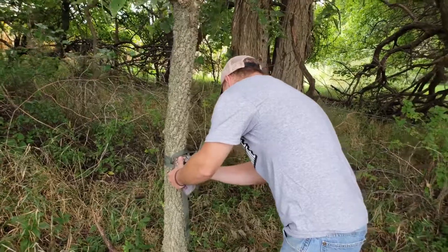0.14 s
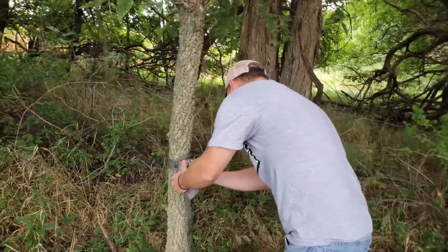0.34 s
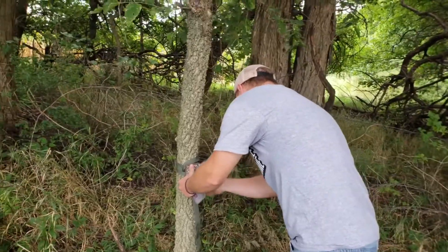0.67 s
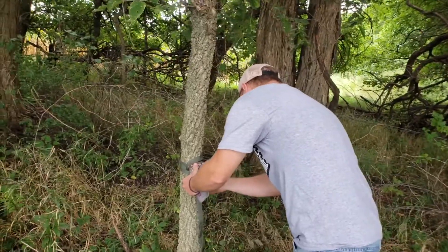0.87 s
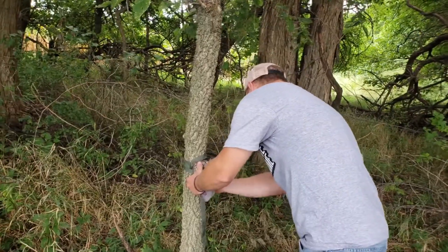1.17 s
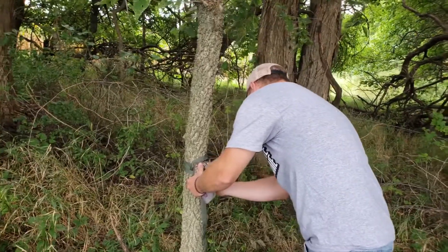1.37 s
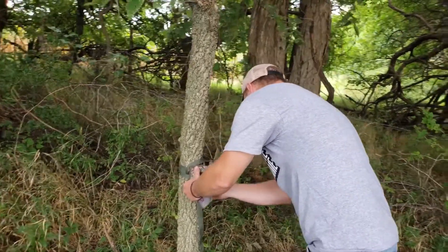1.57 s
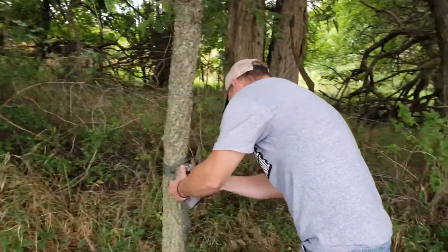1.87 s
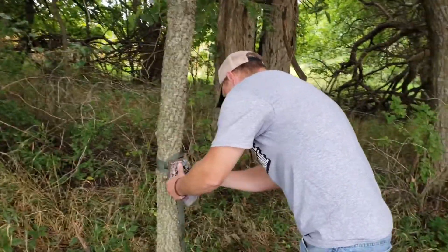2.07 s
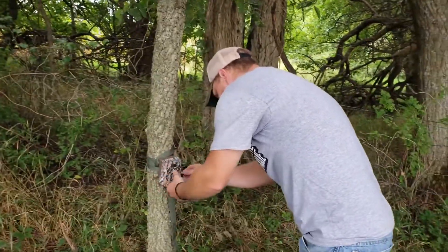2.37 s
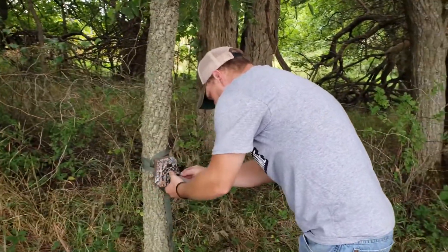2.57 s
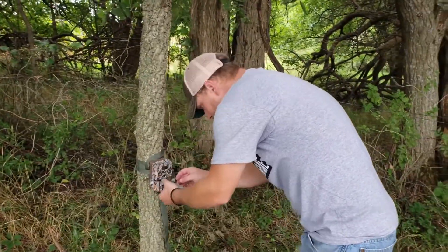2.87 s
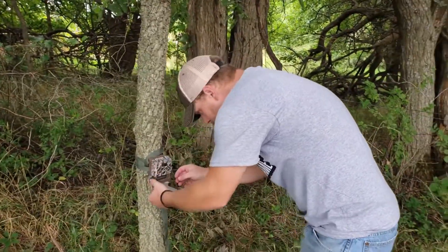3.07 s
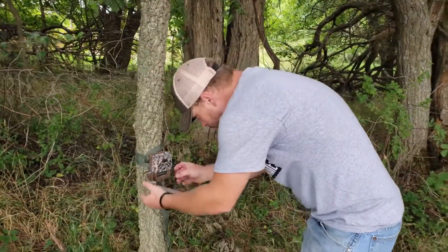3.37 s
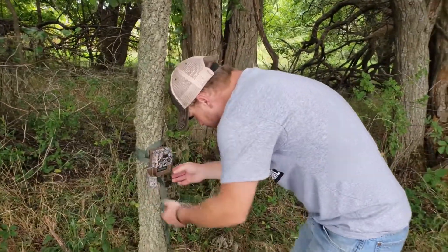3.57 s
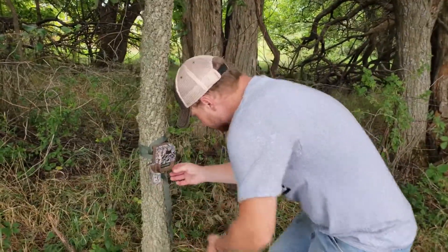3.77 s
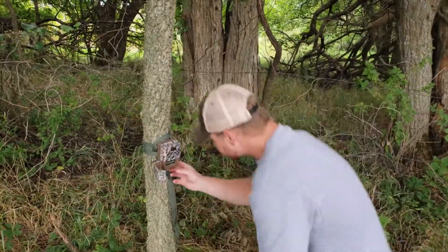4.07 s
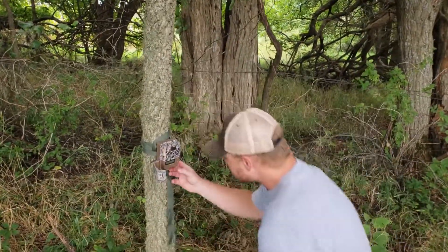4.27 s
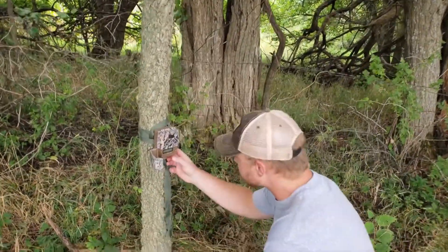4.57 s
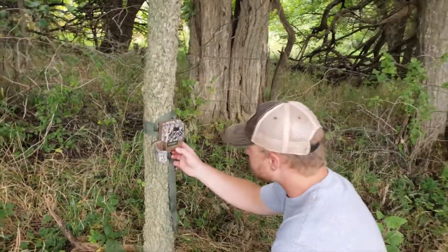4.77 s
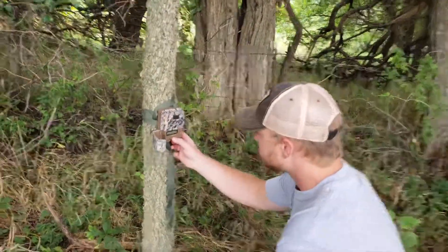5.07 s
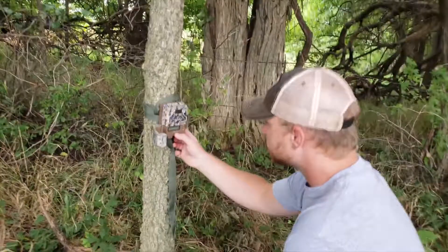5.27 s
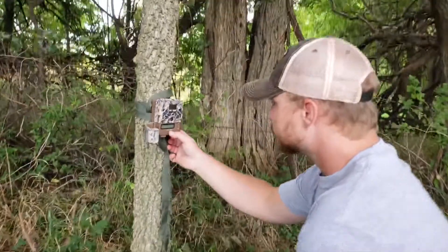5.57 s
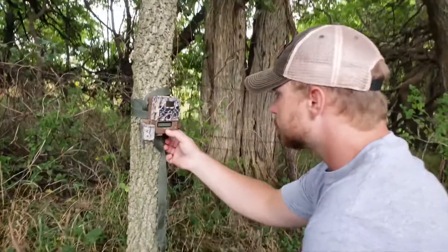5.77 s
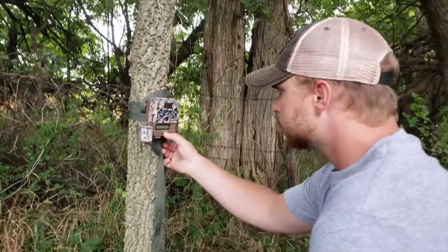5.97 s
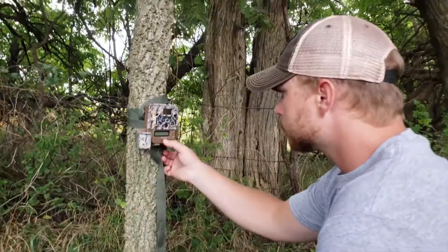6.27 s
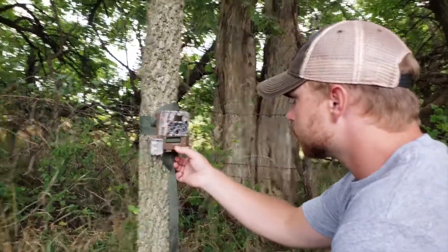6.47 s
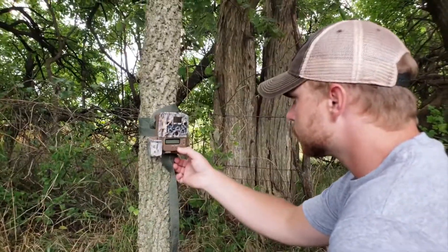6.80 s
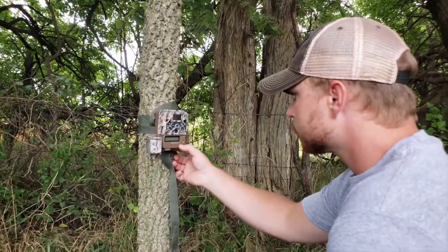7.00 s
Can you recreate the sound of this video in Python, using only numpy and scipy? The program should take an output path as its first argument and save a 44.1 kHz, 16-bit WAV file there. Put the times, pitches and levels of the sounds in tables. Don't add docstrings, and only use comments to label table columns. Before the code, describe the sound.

Hands snap and click a small hollow plastic case strapped to a tree, clothes rustling, while crickets chirp and katydids hiss steadily around.

```python
import sys
import numpy as np
from scipy import signal
from scipy.fft import rfft, irfft, next_fast_len
from scipy.io import wavfile
from scipy.ndimage import uniform_filter1d, map_coordinates

SR = 44100
rng = np.random.default_rng(int(sys.argv[2]) if len(sys.argv) > 2 else 0)


def attenuation_scalar(level_db):
    decades = np.asarray(level_db, float) / 20
    return 10 ** decades


def master(y):
    cut = np.clip(np.atleast_2d(y).T, -1, 1)
    pcm = np.round(cut * 32767)
    wavfile.write(sys.argv[1], SR, pcm.astype(np.int16))


N = 314874


def unit(x):
    return x / np.sqrt(np.mean(x ** 2) + 1e-20)


def along(points, hz):
    f, v = np.transpose(points)
    return np.interp(np.log(hz + 1), np.log(f + 1), v)


def curves(rows):
    s, *cols = np.transpose(rows)
    return [np.interp(np.arange(N) / SR, s, c) for c in cols]


def wobble(rate):
    knots = rng.standard_normal(int(N * rate / SR) + 4)
    return map_coordinates(knots, [np.arange(N) * rate / SR])


def filtered(x, response):
    m = next_fast_len(x.shape[-1] + 8192)
    return irfft(rfft(x, m) * response(np.fft.rfftfreq(m, 1 / SR)), m)[..., :x.shape[-1]]


def mode(f, hz, width_hz):
    return 1j * f * width_hz / (hz * hz - f * f + 1j * f * width_hz)


def add(track, s, sound):
    start = max(round(s * SR), 0)
    track[start:start + len(sound)] += sound[:len(track) - start]


def rush(spectrum, alike, patchy_db, grain_db=0):
    z = signal.stft(rng.standard_normal((2, N)), nperseg=512)[2]
    field = uniform_filter1d(rng.standard_normal(z.shape[1:]), 6, 0)
    field = uniform_filter1d(field, 10, 1)
    pair = signal.istft(z * attenuation_scalar(patchy_db * unit(field)), nperseg=512)[1][:, :N]
    grains = np.minimum(rng.exponential(size=N // 32 + 1), 4)
    pair = pair * attenuation_scalar(grain_db * np.repeat(grains, 32)[:N])

    def middle_and_side(hz):
        turn = np.arccos(np.clip(along(alike, hz), -1, 1)) / 2
        return attenuation_scalar(along(spectrum, hz)) * [np.cos(turn), np.sin(turn)]

    mid, side = filtered(pair, middle_and_side)
    return unit(np.array([mid + side, mid - side]))


# pitch_hz, level_db (per Hz)
AIR = [(12, -36.5), (20, -13), (102, -0.5), (172, -14), (210, -16.5), (255, -14.5), (432, -15.5),
       (493, -15.5), (671, -16), (1410, -19), (1760, -19.5), (2920, -19), (3800, -13.5), (4940, -29),
       (8360, -120)]
# pitch_hz, coherence (0 to 1)
AIR_ALIKE = [(40, 0.82), (130, 0.64), (290, 0.55), (640, 0.19), (3000, 0)]


def air():
    level_db = -69.5 + 0.17 * wobble(0.63) + np.array([[.5], [-.5]])
    return attenuation_scalar(level_db) * rush(AIR, AIR_ALIKE, patchy_db=1.5)


# pitch_hz, level_db (per Hz)
KATYDIDS = [(4800, -58), (5150, -11.5), (5700, -8), (6200, -19.5), (6600, -13.5), (7540, -3.5),
            (8500, -11.5), (8800, -17.5), (9900, -20.5), (10600, -10.5), (12400, -7.5), (14000, -11.5),
            (15600, -8.5), (15900, -21)]


def katydids():
    level_db = -57.0 + 0.21 * wobble(0.91) + 0.092 * wobble(13) + np.array([[-.6], [.6]])
    return attenuation_scalar(level_db) * rush(KATYDIDS, [(6000, 0.0016)], patchy_db=1.36)


def stroke(hz, db, length, fall, rough, turn=0):
    u = np.linspace(0, 1, round(length * SR))
    drift = rough * np.cumsum(rng.standard_normal(len(u)))
    glide = hz * (1 + fall * (.5 - u))
    phase = 2 * np.pi * np.cumsum(glide) / SR + drift + rng.uniform(0, 2 * np.pi)
    return np.sqrt(2) * attenuation_scalar(db) * np.sin(np.pi * u) * np.sin(phase + turn)


# time_s, level_db
FAR_SONG = [
    (0.2, -68.5),
    (7.0, -68.5),
    (7.14, -60),
]


def far_crickets(count=260):
    song = np.zeros((2, N))
    for place, pitch, size, ear in rng.random((count, 4)):
        for k in range(3):
            one = stroke(4000 + 900 * pitch, 7 * size, .034, fall=0.025, rough=.03)
            add(song[int(ear * 2)], place * (N / SR - 1 / 8) + k / 20, one)
    band = [(3300, -120), (3600, -15.5), (4100, -2.5), (4250, 2.5), (4400, -2.5), (4860, -4),
            (4960, -22.5), (5100, -120)]
    merged = rush(band, [(4000, 0.023)], patchy_db=3.0)
    level_db = curves(FAR_SONG)[0] + 7.0 + np.array([[-1.5], [1.5]])
    return attenuation_scalar(level_db) * unit(0.78 * unit(song) + merged)


# peak_s, rms_db, half_width_s
PUFFS = [
    (.06, -73, 0.096),
    (1.69, -68.5, 0.037),
    (2.52, -85, 0.053),
    (3.4, -71, 0.026),
    (4.25, -71, 0.099),
    (4.47, -66, 0.13),
    (5.02, -60.5, 0.07),
    (5.48, -64, 0.1),
    (6.04, -64, 0.052),
]
# pitch_hz, level_db (per Hz)
BUFFET = [(10, -11), (40, 0), (100, -10.5), (250, -20.5), (600, -65)]


def breeze():
    t = np.arange(N) / SR
    gusts = sum(attenuation_scalar(db) * np.exp(-((t - s) / width) ** 2) for s, db, width in PUFFS)
    start_s, end_s, drone_hz, drone_db = 1.4, 3.5, 205, -86.5
    fade = np.clip(np.minimum(t - start_s, end_s - t) / .1, 0, 1)
    tone = np.sin(2 * np.pi * drone_hz * t + 0.72 * wobble(7.2))
    drone = attenuation_scalar(drone_db + 1.8 * wobble(6.6)) * fade * tone
    return gusts * rush(BUFFET, [(40, .1)], patchy_db=4.5) + np.sqrt(2) * drone


def swell(s, db, rise, fall):
    t = np.arange(N) / SR - s
    away = np.where(t < 0, -t / rise, t / fall)
    round_top = 0.17
    return attenuation_scalar(2 * (db - 20 * away ** 2 / (away + round_top)))


def grit(gain, count=7000):
    middle_hz, octaves, cycles, level_db, uneven_db = 2596, 0.41, 1.8, -0.83, 3
    length = 200
    when, pitch, size, pan = rng.random((count, 4)).T
    start, t = (when * (N - length)).astype(int), np.arange(length) / SR
    hz = middle_hz * 2 ** (octaves * np.log(pitch / (1 - pitch)) * 0.56)[:, None]
    hz = np.clip(hz, 1300, 6000)
    ticks = np.sin(2 * np.pi * hz * t) * np.exp(-hz * t / cycles) * np.sqrt(hz / middle_hz)
    ticks = ticks * attenuation_scalar(-uneven_db * np.log(np.maximum(size, .05)))[:, None]
    where = (start[:, None] + np.arange(length)).ravel()
    pair = [np.bincount(where, (ticks * np.sqrt(share)[:, None]).ravel(), N) for share in (pan, 1 - pan)]
    return attenuation_scalar(level_db) * gain * unit(np.array(pair))


# peak_s, body_db, bright_over_body_db, rise_s, fall_s (over 20 dB)
RUSTLE = [(0.014, -43, 7, .05, 0.098), (.68, -64.5, 4.5, 0.2, 0.27), (1.22, -56, -13, 0.056, 0.14),
          (1.36, -64, 8.5, 0.6, 0.51), (1.75, -72.5, -1.5, 0.77, 0.61), (1.98, -65, 0.5, 0.12, 0.058),
          (2.9, -80, 12, 3, 4.3), (3.28, -61, 6, 0.027, 0.12), (3.33, -57.5, 5.5, 0.085, 0.13),
          (3.385, -59.5, 7.5, 0.072, 0.031), (3.69, -62, 4.5, 0.11, 0.21), (3.815, -58.5, 3, 0.092, 0.051),
          (4.0, -70, 2, 0.5, 0.77), (4.45, -69, 2, 0.098, .5), (4.6, -66.5, 6.5, 0.28, 0.097),
          (4.9, -59.5, 2, 0.25, 0.42), (5.2, -58.5, -1.5, 0.41, 0.46), (5.5, -66, 5, 0.32, 0.69),
          (5.9, -67, 7, 0.47, 0.24), (6.285, -67.5, 8.5, .03, .025), (6.5, -77, -10.5, 0.32, 0.5)]
# pitch_hz, level_db (per Hz)
CLOTH = [(150, -30), (400, -10.5), (900, -13.5), (1500, -3.5), (2200, -4), (3500, 4), (5000, 0),
         (7000, -20.5), (9000, -58)]
# pitch_hz, level_db (per Hz)
LEAVES = [(4000, -120), (5000, -6), (6200, -5), (7500, -2.5), (9300, -4.5), (12500, 2.5), (16000, -5.5)]


def rustle():
    moves = np.array([swell(s, db, rise, fall) for s, db, _, rise, fall in RUSTLE])
    body_gain = np.sqrt(moves.sum(axis=0))
    bright_gain = np.sqrt(attenuation_scalar(2 * np.array(RUSTLE)[:, 2]) @ moves)
    cloth = rush(CLOTH, [(300, 1.0), (1500, 0.16), (4000, 0.089)], patchy_db=0.3, grain_db=2.0)
    body = grit(body_gain) + attenuation_scalar(4.0) * body_gain * cloth
    leaves = rush(LEAVES, [(6000, 0.067)], patchy_db=3.0, grain_db=1.7)
    bright = attenuation_scalar(3.5) * bright_gain * leaves
    return attenuation_scalar(0.6 * wobble(37)) * (attenuation_scalar(np.array([[-1.5], [1.5]])) * body + bright)


def contacts(rows, attack, kick):
    track, t = np.zeros(N), np.arange(SR // 16) / SR
    for s, db, hz, crack_db, t60, spread in rows:
        rub = rng.standard_normal((2, len(t))) * attenuation_scalar(-60 * t / t60) * (1 - np.exp(-t / attack))
        rub[:, 12] += kick
        skirt_hz = np.sqrt(hz * 2800)

        def shell(f):
            peak = 2.0 * mode(f, hz, 0.21 * hz) + 0.67
            return mode(f, skirt_hz, spread * skirt_hz) ** 2 * peak

        body = filtered(rub[0], shell)
        crack = filtered(rub[1], lambda f: mode(f, 12100, 9000) ** 2)
        both = body / abs(body).max() + attenuation_scalar(crack_db) * crack / abs(crack).max()
        add(track, s, attenuation_scalar(db + 2.0) * both)
    return track


# start_s, peak_db, body_hz, crack_db, t60_s
RASPS = [
    (.0058, -19, 790, 5, 0.012),
    (0.0055, -20, 4800, 0, 0.014),
    (0.0102, -20.5, 4800, 0, 0.017),
    (.0098, -25, 800, 1, 0.013),
    (1.202, -36, 1870, -6, 0.054),
    (1.3971, -35, 1740, 8.5, 0.028),
    (1.397, -29, 4370, -6, 0.023),
]
# start_s, peak_db, body_hz, crack_db, t60_s
SCRAPES = [
    (1.185, -34, 1280, -16, 0.025),
    (1.1852, -33.5, 2100, -11, 0.033),
    (1.2016, -29, 1260, -7, 0.027),
    (1.2087, -39.5, 3500, -10, 0.013),
    (2.671, -52, 1450, -15, 0.083),
    (2.674, -49, 2160, -14, 0.057),
    (1.2046, -28.5, 4180, -20, 0.039),
    (6.245, -34, 1830, -12.5, 0.019),
    (6.2504, -49, 2300, 14, .008),
    (6.277, -53.5, 3500, 4, 0.018),
]


def rubs():
    rows = [(*row, 0.97) for row in SCRAPES] + [(*row, 4.2) for row in RASPS]
    return contacts(rows, attack=0.00037, kick=0.27)


# start_s, peak_db
BUCKLE = [
    (.0062, -24.5),
    (.0098, -28.5),
    (.02, -30.5),
]
# start_s, level_db
CASE_BLOWS = [
    (1.185, -46),
    (1.204, -31),
    (1.212, -42.5),
]
# pitch_hz, width_hz, level_db
CASE = [(304, 21, -13.5), (613, 83, -1), (1292, 81, 6.5), (1870, 200, 3), (2610, 170, -1), (3070, 120, 1),
        (3680, 150, -4)]
# start_s, peak_db, pitch_hz
KNEE = [
    (4, -59.5, 230),
    (3.715, -58.5, 220),
    (3.74, -61, 200),
    (3.825, -52, 710),
    (3.788, -50.5, 154),
    (3.783, -44, 302),
    (3.796, -41.5, 317),
    (3.798, -45, 785),
]


def thuds():
    track, t = np.zeros(N), np.arange(SR // 10) / SR
    for s, db in CASE_BLOWS:
        ring = np.zeros(len(t))
        for hz, width_hz, level_db in CASE:
            decay = np.exp(-np.pi * width_hz * t)
            ring += attenuation_scalar(level_db + rng.normal(0, 1.0)) * decay * np.sin(2 * np.pi * hz * t)
        add(track, s, attenuation_scalar(db) * ring * (1 - np.exp(-t / 0.0016)))
    buckle_hz, buckle_t60_s = 792, 0.014
    for s, db in BUCKLE:
        add(track, s, attenuation_scalar(db - 60 * t / buckle_t60_s) * np.sin(2 * np.pi * buckle_hz * t))
    for s, db, hz in KNEE:
        puff = rng.standard_normal(len(t)) * attenuation_scalar(-60 * t / 0.069) * (1 - np.exp(-t / 0.0012))
        push = filtered(puff, lambda f: mode(f, hz, 10.0 * hz) * mode(f, hz, 0.33 * hz))
        add(track, s, attenuation_scalar(db) * push / abs(push).max())
    return track


# start_s, peak_db, body_hz, crack_db, spread (share of shell pitch)
SNAPS = [(0.0201, -11.5, 814, 4.5, 5.1), (0.0196, -15, 2040, -9, 3), (1.9506, -36.5, 700, -14, 4),
         (4.9904, -26.5, 2900, -6, 0.72), (5.8544, -21.5, 3870, -26, 0.88),
         (6.2584, -20.5, 4270, -17, 1.45), (6.259, -25, 1360, -16, 1.9), (6.259, -25.5, 2340, -6, 1.6),
         (5.8547, -33, 3070, -25, 1), (5.8542, -21.5, 6200, -11, 1.55), (5.8578, -38, 3050, -12, 0.72),
         (6.288, -36, 4040, 11, 3.2), (6.2623, -42, 3200, -12, 1.8)]


def snaps():
    t60_s = 0.014
    rows = [(*row, t60_s, spread) for *row, spread in SNAPS]
    return contacts(rows, attack=.0002, kick=4.9)


# peak_s, peak_db, rise_s, stop_s, high_over_low_ring_db
SLIPS = [
    (4.766, -38, 0.0059, 0.0062, 15),
    (4.798, -34.5, 0.007, 0.0013, 7.5),
    (4.8425, -26.5, .0015, 0.0022, 3.5),
    (4.8475, -34, 0.0012, 0.0012, 20),
    (6.2635, -32.5, 0.0018, 0.0022, 8),
    (0.034, -33, 0.0083, 0.023, 18),
]


def slips():
    track, t = np.zeros(N), np.arange(SR // 10) / SR - 1 / 40
    fizz_db = 2.5
    colours = [(2066, 330), (4250, 2200), (12400, 8000)]
    for s, db, rise, stop, high_db in SLIPS:
        envelope = np.exp(-(t / np.where(t < 0, rise, stop)) ** 2)
        parts = []
        for hz, width_hz in colours:
            rub = rng.standard_normal(len(t)) * envelope
            part = filtered(rub, lambda f: mode(f, hz, width_hz) ** 2)
            parts.append(part / abs(part).max())
        balance = attenuation_scalar(np.array([0, high_db, high_db + fizz_db]))
        add(track, s - 1 / 40, attenuation_scalar(db - max(high_db, 0)) * balance @ np.array(parts))
    return track


# first_stroke_s, rms_db
HIGH_CHIRPS = [(.064, -51), (.5, -52.5), (1.064, -51), (1.465, -50), (1.922, -54), (2.388, -51),
               (2.853, -54), (3.371, -49.5), (3.853, -51.5), (4.372, -51.5), (4.835, -59), (5.29, -58),
               (5.686, -54), (6.1, -50), (6.488, -51.5), (6.979, -51.5)]
# first_stroke_s, rms_db
ANSWERS = [(.335, -61), (1.768, -57), (2.7, -61.5), (2.987, -56), (3.588, -56.5), (4.641, -56),
           (5.025, -58), (5.418, -56.5), (5.814, -55), (6.599, -52.5), (6.848, -55.5)]
# first_stroke_s, rms_db
RIGHT_CHIRPS = [(.132, -65.5), (.61, -65), (.83, -77), (1.008, -66.5), (1.494, -63), (1.965, -64),
                (2.455, -66), (2.94, -61.5), (3.43, -72), (3.79, -62), (4.283, -61), (4.703, -63.5),
                (5.6, -70), (6.47, -74)]
# first_stroke_s, rms_db
HALF_RIGHT_CHIRPS = [(.144, -58), (.677, -62), (1.25, -69), (1.82, -57), (2.295, -58), (2.769, -59.5),
                     (3.755, -62), (4.255, -56.5), (4.638, -59), (5.478, -60), (6.015, -55.5), (6.665, -67)]
# first_stroke_s, rms_db
LOW_CHIRPS = [(.15, -62), (.243, -62.5), (.55, -62), (.8, -63.5), (1.04, -61.5), (1.553, -63), (1.934, -59),
              (2.02, -64), (2.52, -68), (2.998, -61), (3.32, -56.5), (3.45, -58), (3.848, -58),
              (3.992, -57), (4.08, -63), (4.2, -64), (4.65, -60), (4.296, -57.5), (5.215, -68), (5.5, -68),
              (5.68, -58.5), (6.143, -58.5), (6.232, -52), (6.32, -64.5), (6.622, -57), (7.014, -59)]
# chirps, pitch_hz, strokes (range per chirp), first_gap_s, gap_growth (ratio)
SINGERS = [
    (HIGH_CHIRPS, 4850, range(3), .046, 1.25),
    (ANSWERS, 4800, range(2), 0.04, 1.01),
    (RIGHT_CHIRPS, 4570, range(3), .043, 0.87),
    (HALF_RIGHT_CHIRPS, 4360, range(3), 0.05, 1.1),
    (LOW_CHIRPS, 4215, range(3), .043, 1.02),
]
# pitch_hz, left_over_right_db
SEATS = [(4200, -13.5), (4370, -4), (4570, -24), (4720, 1.5), (4900, -1)]
# time_s, fall (share of pitch)
SAG = [(0, 0.088), (1.6, .075), (2.6, 0.05), (4.5, 0.037), (7.1, 0.016)]


def near_crickets():
    song = np.zeros((2, N))
    side = np.array([[.5], [-.5]])
    first_flat, first_db = .012, -2
    pitch_scatter, size_scatter_db = .004, 1.1
    for chirps, pitch_hz, strokes, gap, growth in SINGERS:
        for start, level_db in chirps:
            for k in strokes:
                s = start + gap * sum(growth ** j for j in range(k))
                hz = pitch_hz * (1 - first_flat * (k == 0) + pitch_scatter * rng.standard_normal())
                db = level_db + first_db * (k == 0) + size_scatter_db * rng.standard_normal()
                fall = np.interp(s, *np.transpose(SAG)) * along([(4200, .55), (4700, 1.1)], hz)
                ear_db = db - 2.5 + side * along(SEATS, hz)
                pair = stroke(hz * (1.012 - .15 * fall), ear_db, .03, fall, rough=0.057, turn=side * 1.5)
                for ear, sound in zip(song, pair):
                    add(ear, s - .013, sound)
    return song


# start_s, peak_db, body_hz, crack_db, spread (share of shell pitch)
CLICKS = [(0.0734, -24.5, 4100, -22, 1.2), (0.1088, -35.5, 786, -20, 1.8), (1.1, -40.5, 3000, 5, 1.9),
          (1.338, -44, 3300, -21, 1.5), (1.491, -35, 3240, -5, 1.6), (1.56, -45.5, 1500, 7, 2.7),
          (1.633, -45.5, 1530, -6, 2.4), (1.649, -37, 910, 8.5, 2.2), (1.656, -41, 744, -14, 2.2),
          (1.7425, -39, 900, -9, 3), (1.65, -35.5, 3330, -2, 2.3), (1.9515, -34.5, 2760, 0, 3.3),
          (1.7424, -45, 2200, -6, 2.4), (1.873, -38, 2200, -16.5, 2.4), (2.236, -51, 1010, 9.5, 2.8),
          (2.927, -40, 4020, -2, 2.7), (4.418, -39.5, 3300, -20, 1.8), (4.532, -46, 3570, -1.5, 1.8),
          (4.726, -44, 1060, -8, 1.9), (4.8787, -35, 3790, -4, 1.6), (4.945, -48, 480, -8, 1.9),
          (5.068, -43.5, 1000, -17, 1.9), (5.09, -43.5, 656, -14, 1.7), (5.108, -48.5, 800, -5, 2.2),
          (5.1557, -32, 2120, -24, 1.2), (5.288, -37.5, 2950, -21, 1.2), (5.3536, -32, 1800, -22, 1.35),
          (5.458, -46, 1920, -22, .8), (5.5432, -37, 3820, -22, 2.1), (5.663, -34.5, 3940, -16, 0.85),
          (5.938, -43, 3370, -16, 1.6), (6.503, -37.5, 3830, -11, 2.8), (5.5445, -48, 1320, -24, 1.6),
          (1.972, -50, 3260, -12, 1.5), (5.875, -46, 3600, -18, 1.2), (3.045, -46, 3900, -11, 1.7),
          (1.4924, -46.5, 330, -20, 4), (1.398, -44, 450, -19, 4.4), (5.6662, -38, 3900, -14, 1.6)]
# start_s, peak_db, body_hz
CRACKLE = [(1.153, -60, 1380), (1.808, -57, 1060), (3.211, -52.5, 900), (4.905, -43, 1870),
           (4.924, -46, 2130), (4.937, -48, 2330), (4.9445, -41, 2410), (5.067, -39, 3650),
           (5.1076, -39, 2990), (5.248, -54, 2730), (5.716, -51, 3800), (4.68, -52, 2500),
           (5.019, -51.5, 3320), (5.039, -53, 3280), (5.189, -39.5, 2850), (5.212, -42, 3370),
           (5.568, -49, 3120), (5.599, -49, 2200), (6.472, -52, 800), (6.534, -47, 3800)]


def clicks():
    twigs = [(*twig, -5, 1.8) for twig in CRACKLE]
    t60_s = 0.011
    rows = [(*row, t60_s, spread) for *row, spread in CLICKS + twigs]
    return contacts(rows, attack=0.00036, kick=8.9)


# peak_s, rms_db, half_width_s, pitch_hz, width_hz
SCUFF = [
    (3.705, -58.5, 0.069, 1880, 850),
    (3.325, -59.5, 0.04, 1550, 460),
    (3.36, -56.5, 0.033, 2660, 820),
    (5.18, -53, 0.033, 2200, 1800),
]
# peak_s, rms_db, half_width_s, pitch_hz, width_hz
FLICKS = [
    (3.375, -51, .0028, 12600, 3500),
    (3.388, -51, .004, 14000, 4000),
    (3.325, -56, .003, 12000, 4000),
    (3.4, -44, .0006, 11000, 6000),
    (6.278, -52, .0022, 13000, 6000),
    (6.2515, -52, .0012, 13000, 5000),
    (6.2885, -36, .0007, 11000, 3500),
    (6.292, -50, .004, 13000, 5000),
]


def scuff():
    track, t = np.zeros((2, N)), np.arange(SR // 4) / SR - 1 / 8
    for s, db, width, hz, width_hz in SCUFF + FLICKS:
        noise = rng.standard_normal((2, len(t)))
        drag = unit(filtered(noise, lambda f: mode(f, hz, width_hz) ** 2))
        pair = attenuation_scalar(db) * np.exp(-(t / width) ** 2) * drag
        for ear, sound in zip(track, pair):
            add(ear, s - 1 / 8, sound)
    return attenuation_scalar(1.5 * wobble(60)) * track


# pitch_hz, left_over_right_db
EARS = [(300, 0.5), (1300, -3), (3500, -4), (8000, 8), (15000, -2)]


def ears(x, turn=1.54):
    side = np.array([[.5], [-.5]])

    def port(hz):
        lag = np.exp(-1j * turn * np.tanh(hz / 1500) * side)
        return attenuation_scalar(side * along(EARS, hz)) * lag

    return filtered(x, port)


# pitch_hz, t60_s
WOODS = [(300, 0.3), (3000, 0.24), (12000, 0.078)]


def woods(x):
    hz, t, z = signal.stft(rng.standard_normal((2, SR // 3)), SR, nperseg=256)
    decay = attenuation_scalar(-60 * t / along(WOODS, hz)[:, None])
    tail = signal.istft(z * decay, SR, nperseg=256)[1]
    late = np.pad(x, ((0, 0), (130, 0)))
    return signal.fftconvolve(late, tail / np.linalg.norm(tail[0]), axes=1)[:, :N]


def scene():
    hands = ears(rubs() + thuds() + snaps() + slips() + clicks())
    song = near_crickets()
    scatter = woods(attenuation_scalar(-16.5) * hands + attenuation_scalar(-3.5) * song)
    background = air() + katydids() + far_crickets() + breeze()
    return background + rustle() + hands + song + scatter + scuff()


# pitch_hz, level_db
DEAD_ZONE = [(400, -23), (1400, -10), (1900, -7), (2600, -9), (3300, -12), (4200, -10.5), (5100, -6.5),
             (6000, -4.5), (7500, -1), (9000, -2.5), (11000, -2.5), (13500, -2), (15000, -6)]


def starved(x):
    frame, grid = 1024, 729
    n, k = np.arange(2 * frame)[:, None] + .5, np.arange(frame) + .5
    window = np.sin(np.pi * n / (2 * frame))
    basis = window * np.cos(np.pi / frame * (n + frame / 2) * k) * np.sqrt(2 / frame)
    mix = np.array([[1, 0.96], [1, -1.016]]) / np.sqrt(2)
    padded = np.pad(mix @ x, ((0, 0), (2 * frame - grid, 2 * frame + (grid - N) % frame)))
    blocks = padded.reshape(2, -1, frame)
    lines = np.concatenate([blocks[:, :-1], blocks[:, 1:]], axis=2) @ basis
    nearby = abs(uniform_filter1d(lines ** 2, size=130, axis=2))
    nearby = np.minimum(nearby, 1.4 * np.median(nearby, axis=1, keepdims=True))
    band = abs(uniform_filter1d(lines ** 2, size=4, axis=2))
    floor = nearby * attenuation_scalar(2 * along(DEAD_ZONE, k * SR / 2 / frame))
    halves = (lines * (band > floor)) @ basis.T
    joined = halves[:, 1:, :frame] + halves[:, :-1, frame:]
    return mix @ joined.reshape(2, -1)[:, frame - grid:][:, :N]


def low_pass(x):
    return signal.sosfilt(signal.butter(12, 16810, fs=SR, output="sos"), x)


def record(dry):
    fade_s, top_hz = 0.0043, 15750
    faded = dry * np.clip(np.arange(N) / SR / fade_s, 0, 1) ** 2
    limited = filtered(faded, lambda hz: np.where(hz < top_hz, 1, attenuation_scalar(-39.0)) * (hz < 16750))
    return low_pass(starved(limited))


dry = scene()
out = record(dry)
master(out)
```